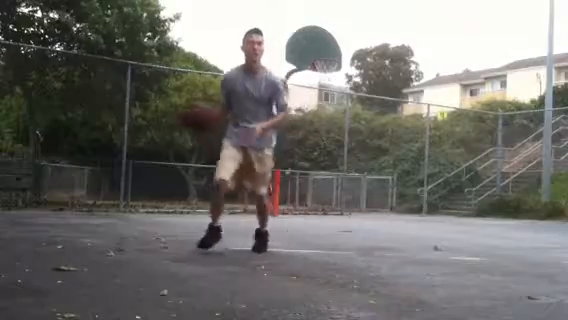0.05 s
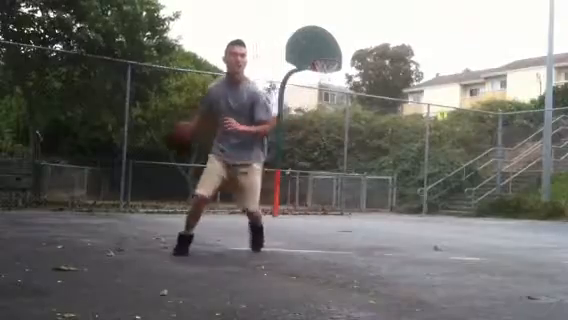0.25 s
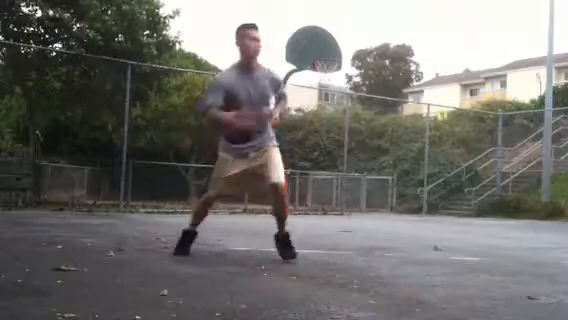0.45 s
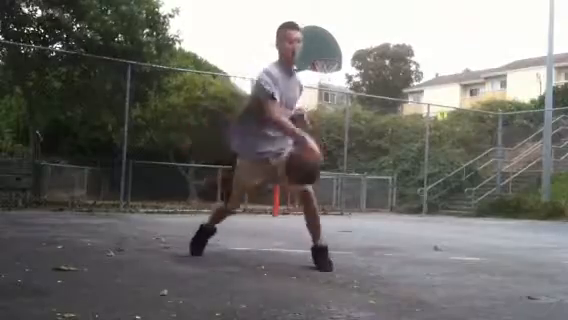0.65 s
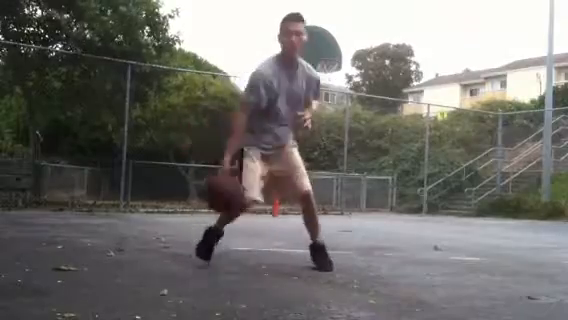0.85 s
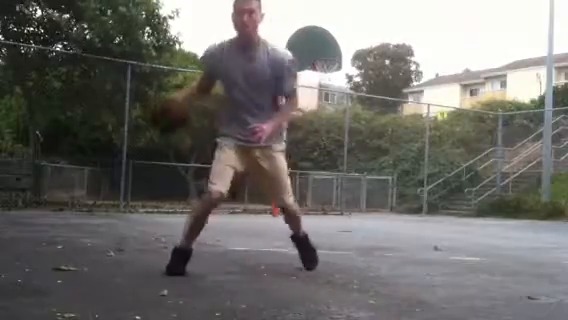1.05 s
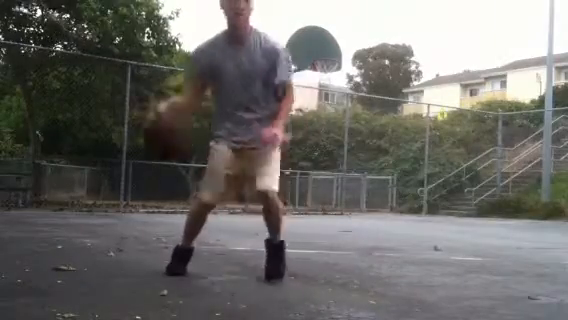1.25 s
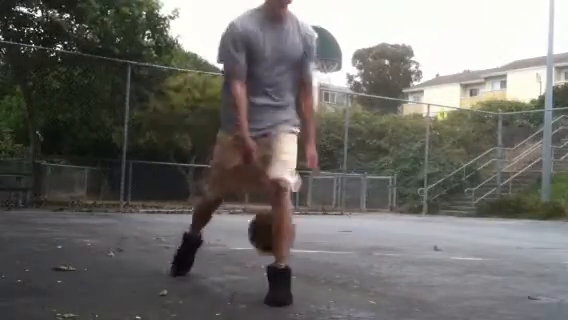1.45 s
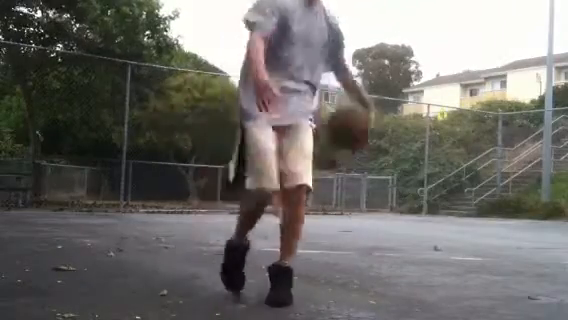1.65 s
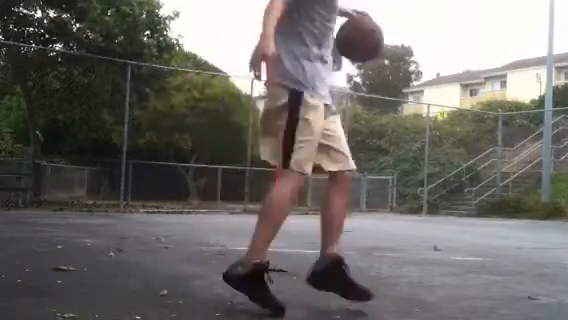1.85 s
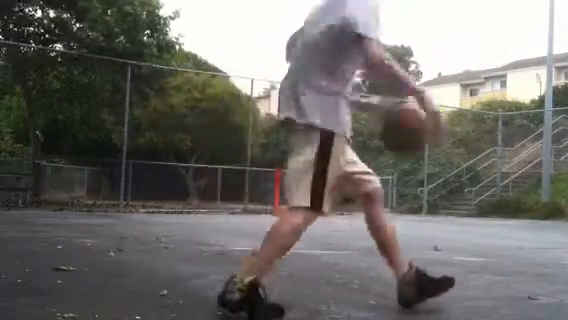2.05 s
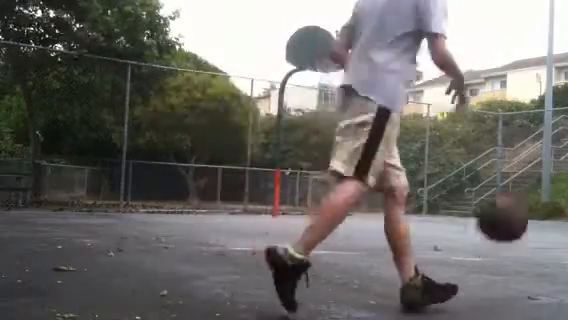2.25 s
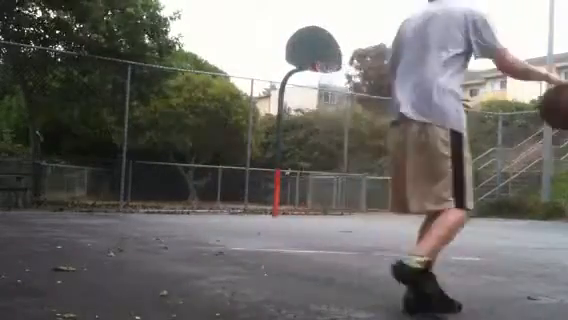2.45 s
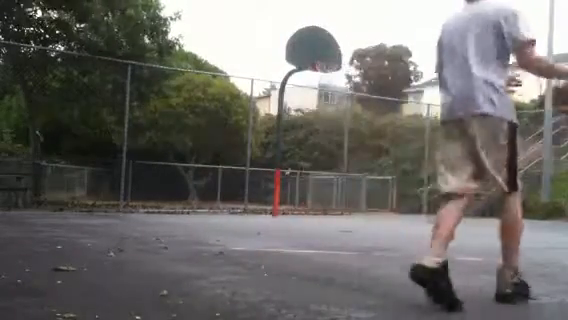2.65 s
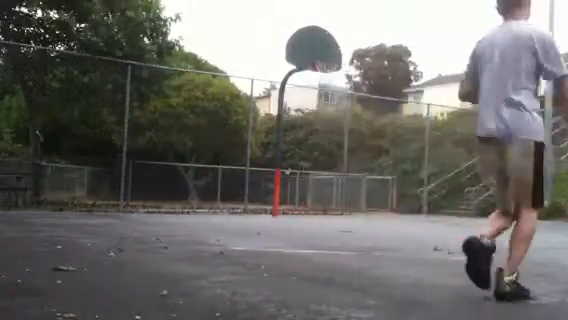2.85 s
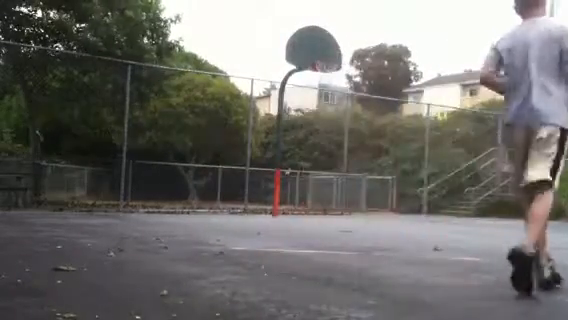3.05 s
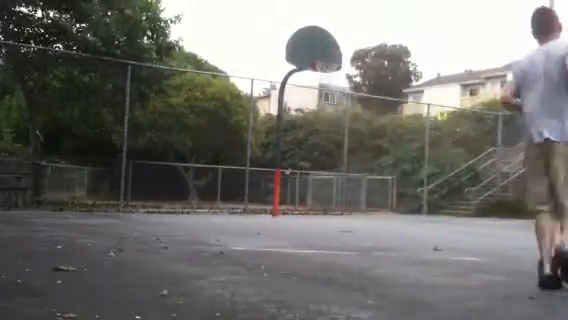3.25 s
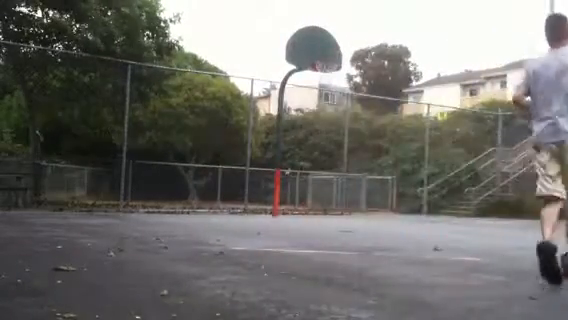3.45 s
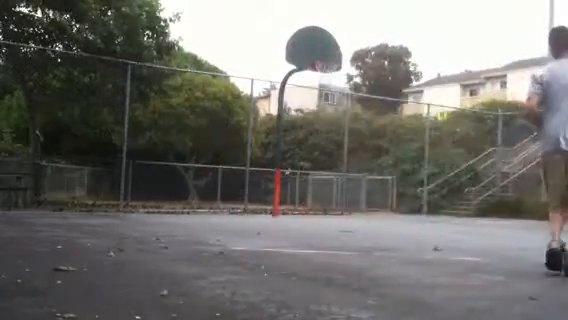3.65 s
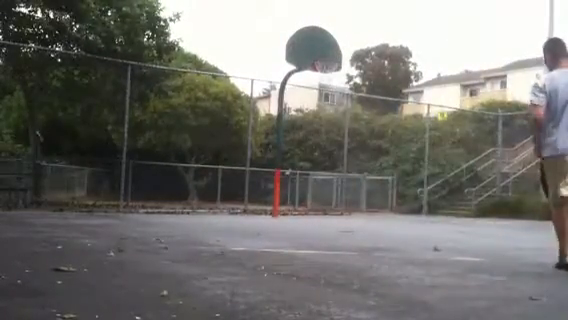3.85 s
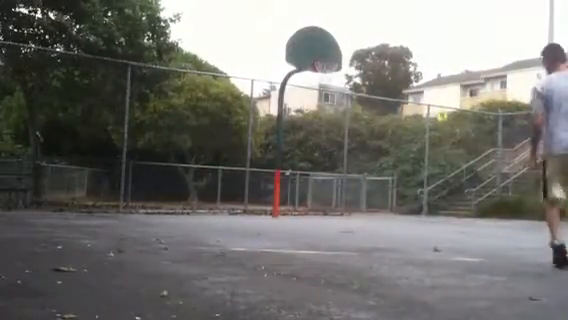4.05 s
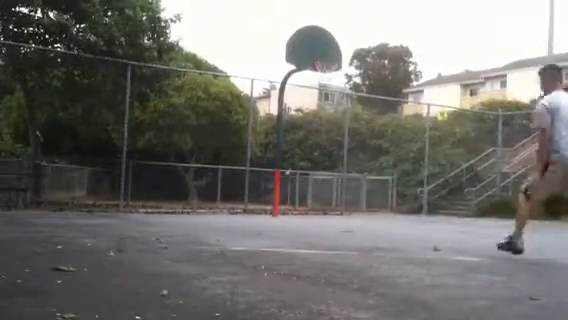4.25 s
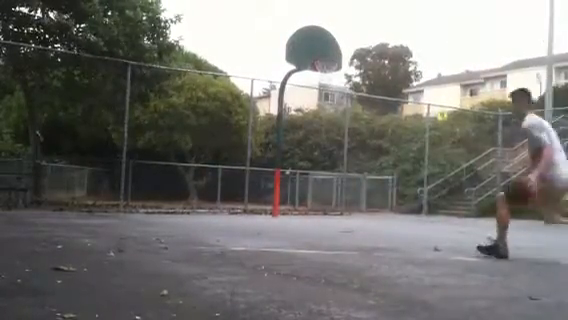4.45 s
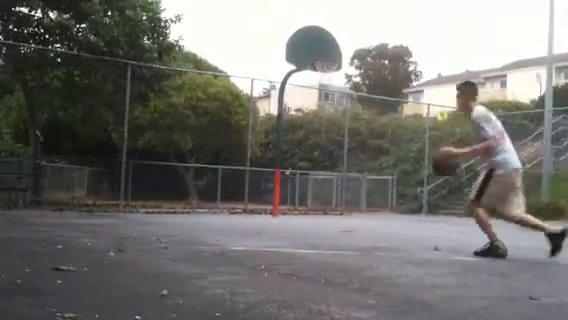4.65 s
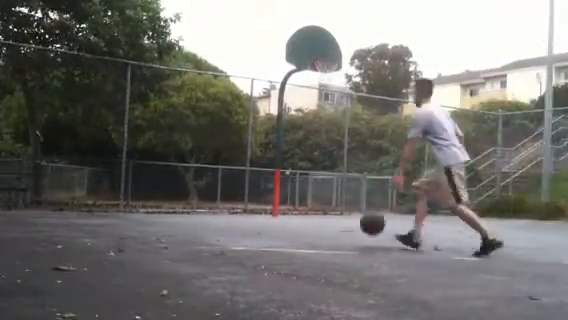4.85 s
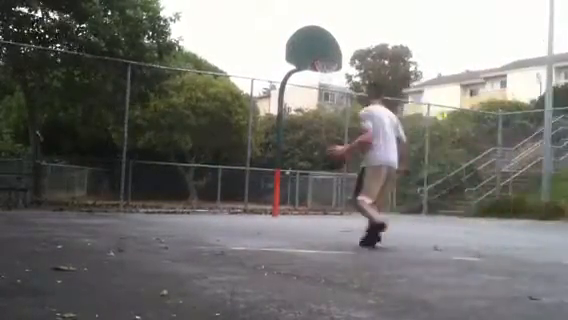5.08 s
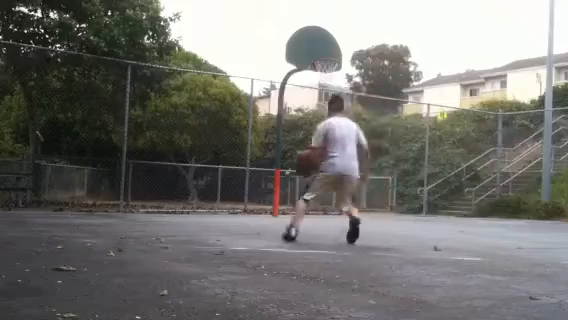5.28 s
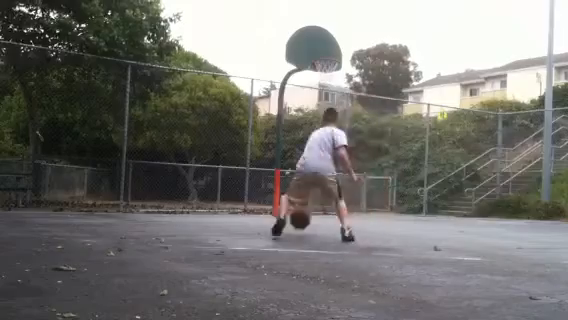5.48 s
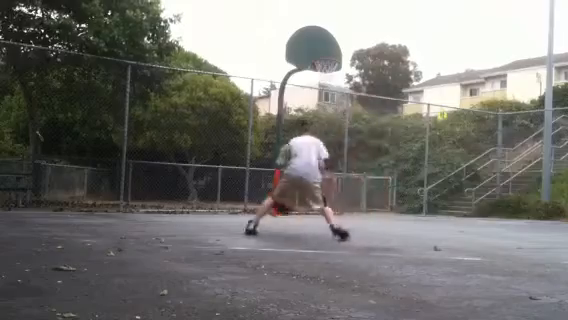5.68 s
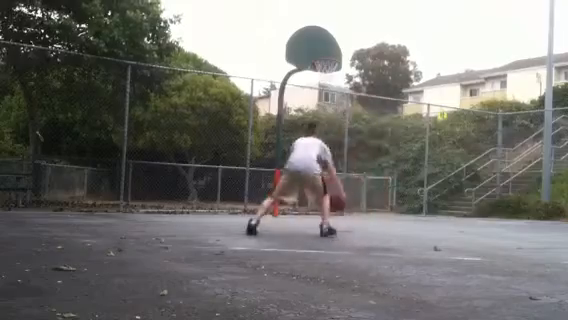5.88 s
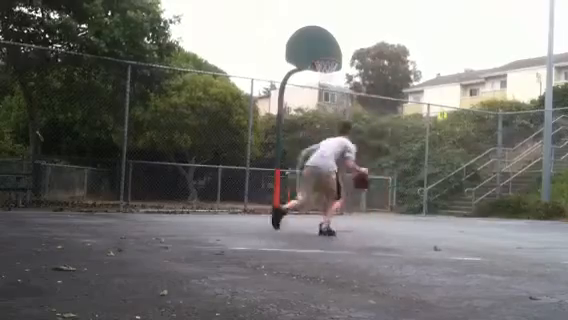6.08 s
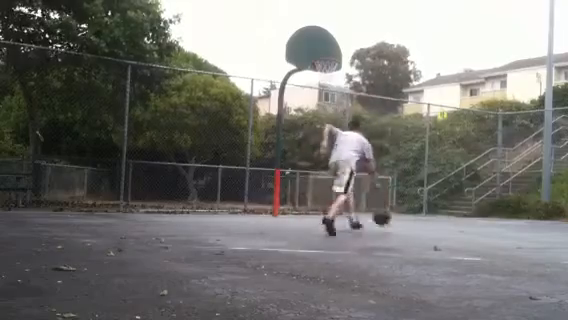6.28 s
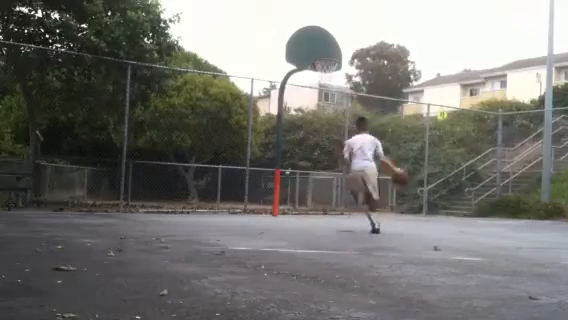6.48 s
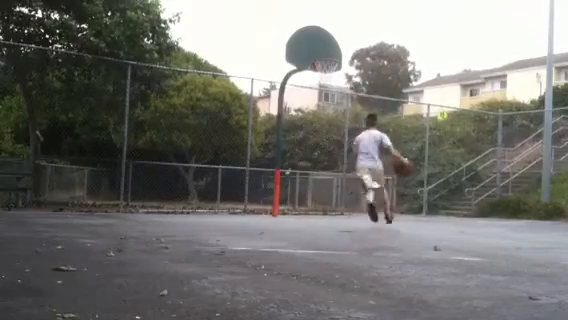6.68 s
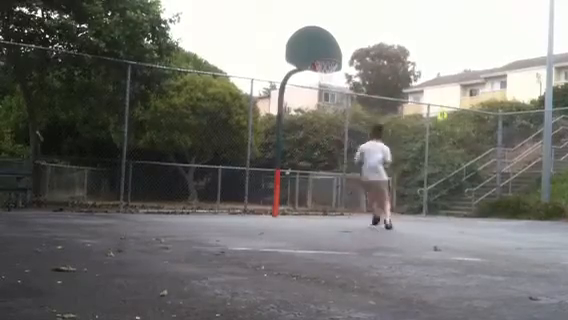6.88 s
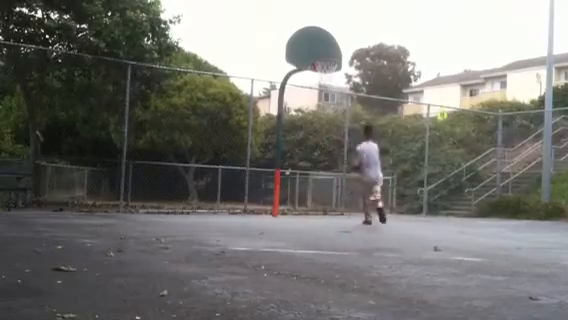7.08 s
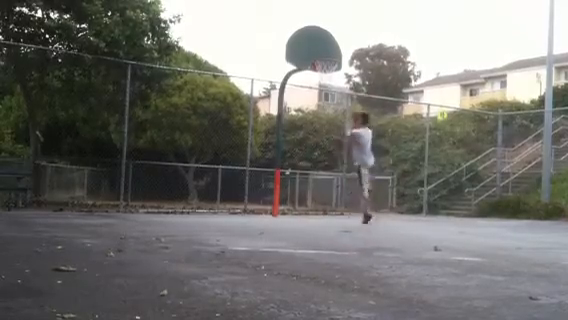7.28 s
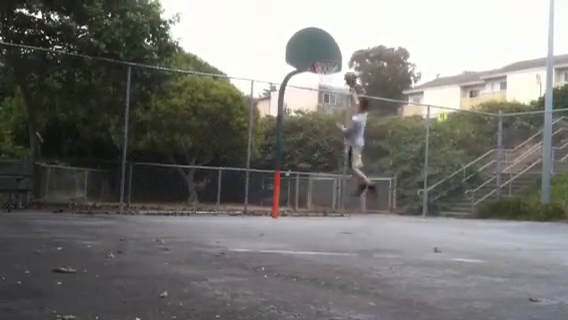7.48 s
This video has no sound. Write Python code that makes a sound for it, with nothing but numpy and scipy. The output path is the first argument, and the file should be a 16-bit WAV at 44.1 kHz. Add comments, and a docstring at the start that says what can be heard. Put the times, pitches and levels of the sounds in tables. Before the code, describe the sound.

On an open hard court, a player moves near the microphone and then away. Loud, dry ball slaps lead, one doubled by a tiny pinging hit, each followed by a short airy echo. Shoes scrape grit, most busily just before a softer quick pair of bounces. Small wind buffets touch the microphone over a quiet bed of distant traffic. After a last medium bounce come a light catch and a scuff, then rustling leaves.

```python
"""A basketball is dribbled on an outdoor asphalt court: each bounce is a sharp slap made of a fading wave,
a brief ring of the air inside and a low push from the squashed ball.
Soles scuff as dense grit clicks; a palm and heels give soft, short tones. Fences, hedges and houses
scatter these sounds as fading noise. Wind is uneven low noise; leaves and far traffic are
noise in flickering bands. A small recorder cuts the bass steeply."""
import sys
import numpy as np
from scipy import signal
from scipy.io import wavfile
from scipy.ndimage import uniform_filter1d

SR = 44100
rng = np.random.default_rng(int(sys.argv[2]) if len(sys.argv) > 2 else 0)


def master_out(mix):
    """Clip the mix to full scale and print it as 16-bit PCM to the path in sys.argv[1]."""
    frames = np.transpose(np.atleast_2d(mix))
    ceiling = np.clip(frames, -1, 1)
    pcm = np.round(ceiling * 32767).astype(np.int16)
    wavfile.write(sys.argv[1], SR, pcm)


N = 331632

# gusts that buffet the microphone: peak_s, level_db, half_width_ms
GUSTS = [(.442, -43, 11), (.472, -42.5, 8), (.68, -49, 30), (1.07, -46, 19), (1.41, -48, 41),
         (2.49, -48, 15), (2.815, -36, 21), (2.87, -40, 14), (4.981, -36, 16), (5.43, -44.5, 64),
         (5.535, -28.5, 22), (5.563, -24.5, 22), (5.69, -33.5, 32), (5.725, -33.5, 25), (5.775, -34.5, 21),
         (5.984, -28.5, 8), (6.171, -38, 10), (6.513, -32, 17.4), (7.29, -50, 16), (7.39, -52, 30)]
# loudness of the leaves over time: time_s, level_db
LEAVES_LEVEL = [(0, -71.5), (2.7, -71), (4.85, -71.5), (5.5, -68), (5.7, -60.5), (5.95, -66), (6.5, -61),
                (7.52, -61)]
# tone colour of rustling leaves: pitch_hz, relative_level_db (per Hz)
LEAVES_COLOUR = [(1500, 17), (4000, 7.5), (8500, 9.5), (11000, 7.5), (13500, -19)]
# tone colour of far traffic: pitch_hz, relative_level_db (per Hz)
TRAFFIC_COLOUR = [(60, -8), (140, -22), (220, 3.5), (440, -3), (700, -3), (950, 0), (1500, -6),
                  (2300, -10.5), (5400, -23.5), (8700, -34.5), (11500, -38.5), (13500, -34)]
# soles scuffing on grit: peak_s, level_db, fall_ms (to -60 dB), low_edge_hz, high_edge_hz
SCUFFS = [(.21, -46, 56, 400, 1500), (0.237, -51.5, 106, 900, 2180), (.65, -60, 200, 1500, 5960),
          (.758, -56, 74, 7000, 13000), (0.819, -40.5, 71, 7340, 10600), (1.071, -45, 38, 300, 1190),
          (1.098, -45, 97, 900, 2180), (1.102, -56, 70, 3400, 4970), (1.47, -36.5, 44, 1490, 10000),
          (1.951, -63, 310, 1500, 7600), (2.729, -52.5, 70, 3500, 12000), (2.763, -47, 18, 3200, 7660),
          (2.863, -54, 18, 3500, 9000), (3.143, -51, 27, 500, 1990), (3.35, -58.5, 110, 1500, 5970),
          (5.063, -57.5, 38, 4930, 14000), (5.28, -35.5, 144, 1090, 4960), (5.458, -46.5, 79, 2980, 13000),
          (5.474, -35.5, 56, 1490, 5460), (5.487, -38.5, 120, 780, 5000), (5.665, -38.5, 159, 494, 3170),
          (6.858, -52, 90, 300, 4000)]
# ball caught by a palm, heels landing: start_s, level_db, pitch_hz
TAPS = [(.206, -35, 700), (.645, -36, 350), (.678, -29, 402), (.708, -33, 230), (1.067, -30, 430),
        (1.109, -27, 1500), (3.899, -32, 597), (3.91, -30.5, 704), (6.359, -32, 2165), (6.463, -28.5, 360),
        (6.855, -28.5, 408)]
# scattering from fences, hedges and houses: pitch_hz, level_db, fall_s (to -60 dB)
COURT_BANDS = [(192, -65, 0.34), (424, -47.5, 0.092), (1020, -51.5, 0.38), (2600, -48.5, 0.45),
               (5200, -51, 0.54), (10800, -40, 0.36)]
# blows of the ball: start_s, slap_level_db, slap_pitch_hz, slap_damping (per cycle), push_level_db,
# push_lag_ms, push_length_ms, ring_pitch_hz, ring_level_db, thrown_back_db
BOUNCES = [(0.825, -0.3, 880, 6.9, -20, 0.068, 3.24, 970, -35, -1),
           (1.4688, -0.5, 2470, 5.6, -22.5, 0.041, 3.2, 1450, -49, -0.5),
           (1.4914, -13.5, 3640, 0.83, -25.5, 0.05, 2.6, 1720, -12.5, -17),
           (2.2476, -0.5, 3040, 3.5, -24.5, 2.93, 4.7, 1430, -13, -4),
           (2.9488, -0.5, 5700, 3.8, -19, 1.86, 3.63, 1330, -13.5, -2.5),
           (3.682, -3, 2670, 5.4, -20.5, 2.4, 3.52, 1490, -20.5, 0.5),
           (4.3936, -8, 1710, 3.2, -22.5, 0.035, 3.75, 973, -17, 1.5),
           (4.3965, -14, 670, 1.9, -37.5, 0.041, 3.94, 1050, -39, -22),
           (4.8996, -6, 2180, 4.1, -26, 2.7, 3.3, 1020, -17.5, 0),
           (5.59, -15.5, 3500, 2.3, -30, 2.4, 4.2, 1410, -22.5, 1),
           (5.8388, -17.5, 3640, 5, -31, 1.14, 3.55, 1730, -30.5, 4),
           (6.393, -7.5, 1800, 13.4, -25, 2.44, 3.5, 1510, -20, 2.5)]
# air and shell of the ball: pitch_hz, level_db (against the ring), fall_s (to -60 dB)
CAVITY = [(436, -23.5, .02), (893, -17, 0.016), (1455, -14.5, 0.021), (1866, -19.5, 0.034),
          (2720, -24.5, 0.035)]

WIND_DB, WIND_SWELL_DB = -50, 1
TRAFFIC_DB = -52
SCUFF_RISE_SHARE, SCUFF_HISS_DB = .14, -12.5   # rise as a share of the fall; hiss against the grit
TAP_CYCLES = 6.1   # cycles for a tap to fall by 60 dB
CONTACTS_THROWN_BACK_DB = -1.5   # scuffs and taps sent into the court
GRIT_DB, RING_DECAY_MS = -28.5, 1.12   # grit against the slap; time for the ring to fall to 37 percent
CROSSING_S, CROSSING_DB = 0.000803, -6.5
LIFT_OFF_S, LIFT_OFF_DB = .0115, -6.5
WALL_ECHO_S, WALL_ECHO_DB, WALL_HZ = .0405, -19.5, 7000   # WALL_HZ is the top of the echo
BASS_CUT_HZ, BASS_LEAK_DB = 134.2, -14
TREBLE_DROOP_HZ, CUTOFF_HZ = 10440, 15800


def from_db(db):
    """Turn decibels into a gain."""
    return 10 ** (np.asarray(db) / 20)


def rms_one(x):
    """Scale a sound to an rms (average strength) of 1."""
    return x / np.sqrt(np.mean(x ** 2) + 1e-20)


def band(x, low_hz, high_hz):
    """Keep the pitches between two edges, with gentle slopes outside."""
    edges = [low_hz, min(high_hz, .45 * SR)]
    return signal.sosfilt(signal.butter(2, edges, "band", fs=SR, output="sos"), x)


def drift(rate_hz):
    """Wander slowly around zero by chance, with a typical size of 1."""
    step = 40   # one chance value per 40 samples, joined by straight lines
    r = np.exp(-2 * np.pi * rate_hz * step / SR)
    chance = rng.standard_normal(N // step + 2002)
    slow = signal.lfilter([1], [1, -2 * r, r * r], chance)[2000:]   # drop the settling start
    return np.interp(np.arange(N) / step, np.arange(len(slow)), rms_one(slow))


def add(out, start_s, sound):
    """Mix a sound in at a given time."""
    i = int(round(start_s * SR))
    out[i:i + len(sound)] += sound[:N - i]


def coloured(spectrum, patchy_db):
    """Add up third-octave bands of noise, each flickering on its own, to an rms of 1."""
    out = 0
    edges = 45 * 2 ** (np.arange(27) / 3)
    white = rng.standard_normal((2, N))   # neighbouring bands use different noise
    hz, level_db = np.transpose(spectrum)
    for k, (low, high) in enumerate(zip(edges, edges[1:])):
        middle = np.log(low * high) / 2
        gain_db = np.interp(middle, np.log(hz), level_db, left=-60, right=-80)
        flicker_db = patchy_db * drift(3.5)
        out = out + from_db(gain_db + flicker_db) * band(white[k % 2], low, high)
    return rms_one(out)


def wind():
    """Eddies on the microphone port make low noise, shaped by swells, lumps and gusts."""
    eddies = band(signal.lfilter([1], [1, -.985], rng.standard_normal(N)), 22.7, 241)
    even = eddies / np.sqrt(uniform_filter1d(eddies ** 2, size=700))   # level out its strength
    now = np.arange(N) / SR
    gusts = 0
    for peak_s, level_db, half_width_ms in GUSTS:
        gusts = gusts + from_db(level_db) * np.exp(-((now - peak_s) * 1000 / half_width_ms) ** 2)
    swells_db = WIND_SWELL_DB * drift(4.5)
    lumps_db = 2.0 * drift(26)
    return from_db(WIND_DB + swells_db + lumps_db) * rms_one(eddies) + gusts * even


def leaves():
    """Rustling leaves: flickering noise that grows and fades."""
    rustle_db = np.interp(np.arange(N) / SR, *np.transpose(LEAVES_LEVEL))
    return from_db(rustle_db) * coloured(LEAVES_COLOUR, patchy_db=.5)


def traffic():
    """Far traffic: a steady bed of noise whose bands flicker."""
    return from_db(TRAFFIC_DB) * coloured(TRAFFIC_COLOUR, patchy_db=1.02)


def scuffs():
    """Soles grind out dense, uneven grit clicks in clumps, under a stroke that swells and dies."""
    out, t = np.zeros(N), np.arange(12000) / SR
    for peak_s, level_db, fall_ms, low_hz, high_hz in SCUFFS:
        sizes = from_db(1.6 * np.minimum(rng.exponential(1, len(t)), 3.5))
        clumps = np.repeat(from_db(3.0 * rng.standard_normal(len(t) // 100)), 100)
        clicks = rng.random(len(t)) < .25   # a quarter of the samples carry a click
        grit = rng.standard_normal(len(t)) * sizes * clumps * clicks
        fall = fall_ms / 1000
        rise = SCUFF_RISE_SHARE * fall
        stroke = np.where(t < rise, (t / rise) ** 1.3, from_db(-60 * (t - rise) / fall))
        body = rms_one(band(grit, low_hz, high_hz))
        # fine dust hisses over a wider range
        hiss = from_db(SCUFF_HISS_DB) * rms_one(band(grit, low_hz / 2, 2.94 * high_hz))
        add(out, peak_s - rise, from_db(level_db) * stroke * (body + hiss))
    return out


def taps():
    """Soft contacts shake for a few dying cycles after a cushioned start."""
    out, t = np.zeros(N), np.arange(2000) / SR
    for start_s, level_db, hz in TAPS:
        fade = from_db(level_db - 60 * t * hz / TAP_CYCLES)
        cushion = 1 - np.exp(-t * hz * 6)
        add(out, start_s, fade * np.sin(2 * np.pi * hz * t) * cushion)
    return out


def court(x):
    """Surroundings scatter sound back as noise that builds up quickly, then dies band by band."""
    t, reply = np.arange(SR // 2) / SR, 0
    for hz, level_db, fall_s in COURT_BANDS:
        noise = rms_one(band(rng.standard_normal(len(t)), hz / 1.54, hz * 1.52))
        reply = reply + from_db(level_db - 60 * t / fall_s) * noise
    build_up = np.clip(t / 0.0026, 0, 1) ** 2
    return signal.fftconvolve(x, reply * build_up)[:N]


def ball():
    """Skin slaps, air and shell ring, the squashed ball pushes; give direct sound and court feed."""
    direct, scattered, t = np.zeros(N), np.zeros(N), np.arange(5000) / SR
    chance = rng.standard_normal((len(BOUNCES), len(CAVITY) + len(t)))
    for bounce, luck in zip(BOUNCES, chance):
        (start_s, slap_db, slap_hz, damping, push_db, lag_ms, length_ms,
         ring_hz, ring_db, thrown_back_db) = bounce

        # suction first, then a rebound if lightly damped
        slap = -np.sin(2 * np.pi * slap_hz * t) * np.exp(-damping * slap_hz * t)
        slap = band(from_db(slap_db) * slap, 44, 9400)
        crushed_grit = from_db(GRIT_DB) * luck[len(CAVITY):] * np.exp(-t / 0.0041)

        ring_fade = np.exp(-1000 * t / RING_DECAY_MS) * (1 - np.exp(-t / .0001))
        ring = -np.cos(2 * np.pi * ring_hz * t) * ring_fade
        for (hz, level_db, fall_s), z in zip(CAVITY, luck):
            ring += from_db(level_db + 2 * z - 60 * t / fall_s) * np.sin(2 * np.pi * hz * t)

        squash = np.sin(np.pi * np.clip((1000 * t - max(lag_ms, 0)) / length_ms, 0, 1)) ** 1.28
        squash_rate = -np.gradient(squash) * length_ms * SR / 1000   # sound follows the rate
        push = from_db(push_db) * band(squash_rate, 8.2, 780)

        skin = slap + band(from_db(slap_db) * crushed_grit + from_db(ring_db) * ring, 44, 8500)
        add(direct, start_s, skin + push)
        add(scattered, start_s, from_db(thrown_back_db) * (skin + push))
        # the slap crosses the air inside the ball and comes out again
        crossing_s = CROSSING_S * (1 + .15 * luck[0])
        add(direct, start_s + crossing_s, from_db(CROSSING_DB) * slap)
        # the skin pops back out
        pop = band(slap + 0.32 * push, 44, 1800)
        add(direct, start_s + LIFT_OFF_S, from_db(LIFT_OFF_DB) * pop)
        # a wall throws the slap back
        echo = from_db(WALL_ECHO_DB + thrown_back_db) * band(skin, 1300, WALL_HZ)
        add(direct, start_s + WALL_ECHO_S * (1 + .02 * luck[1]), echo)
    return direct, scattered


def scene():
    """Mix the player, the court, the weather and the town into one channel."""
    background = wind() + leaves() + traffic()
    contacts = scuffs() + taps()
    direct, scattered = ball()
    thrown_back = court(scattered + from_db(CONTACTS_THROWN_BACK_DB) * contacts)
    return (direct + contacts + thrown_back + background)[None]


def record(dry):
    """Cut bass so steeply that its ringing draws each push into a thump; also soften the treble."""
    thin = signal.sosfilt(signal.cheby1(6, .035, BASS_CUT_HZ, "high", fs=SR, output="sos"), dry)
    thin = thin + from_db(BASS_LEAK_DB) * band(dry, 69.4, 120)   # a little deep bass leaks past
    thin = signal.sosfilt(signal.butter(4, TREBLE_DROOP_HZ, fs=SR, output="sos"), thin)
    return signal.sosfilt(signal.cheby2(12, 70, CUTOFF_HZ, fs=SR, output="sos"), thin)


dry = scene()
out = record(dry)
master_out(out)
```